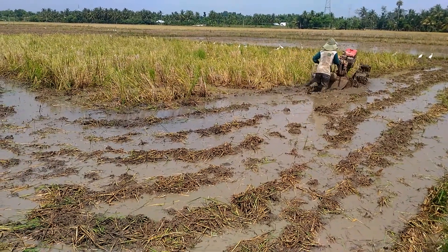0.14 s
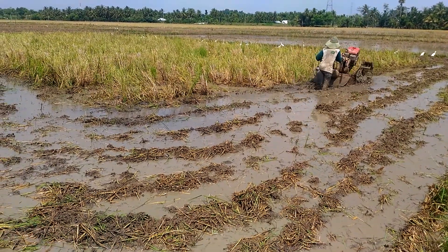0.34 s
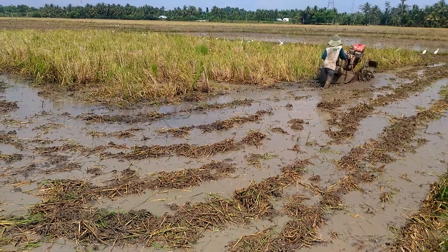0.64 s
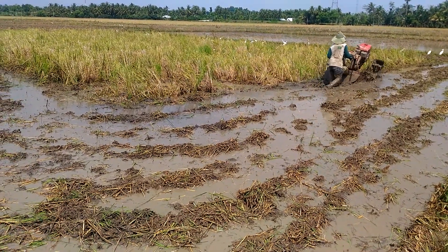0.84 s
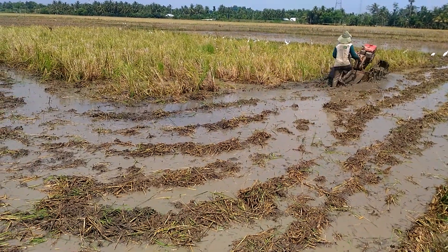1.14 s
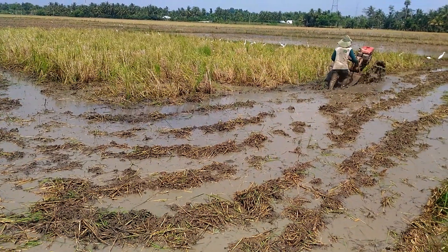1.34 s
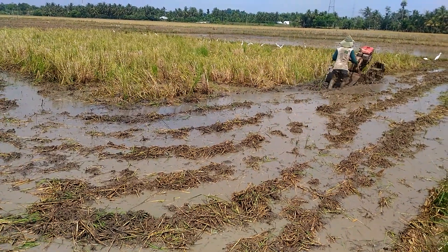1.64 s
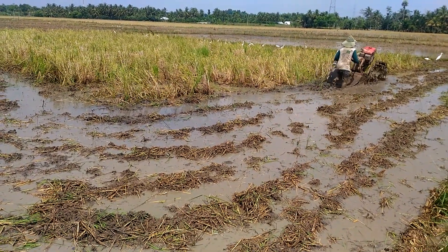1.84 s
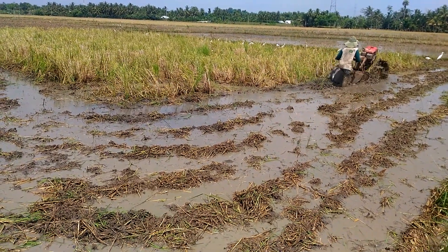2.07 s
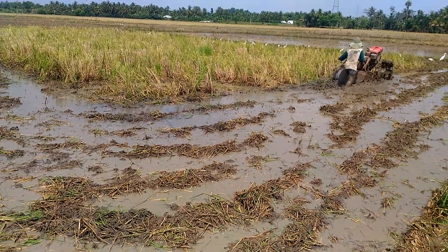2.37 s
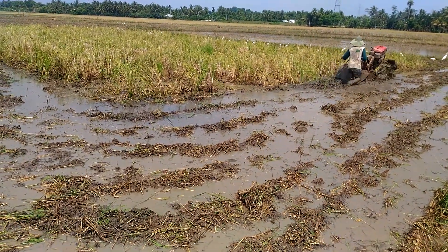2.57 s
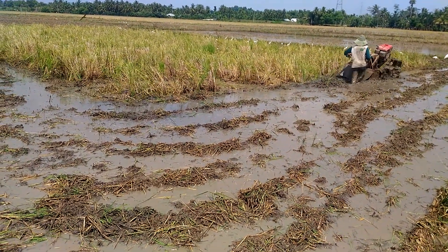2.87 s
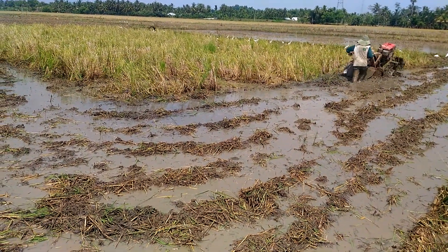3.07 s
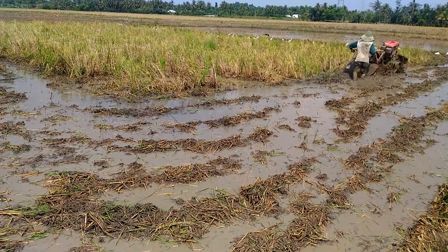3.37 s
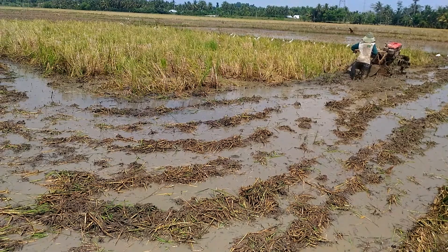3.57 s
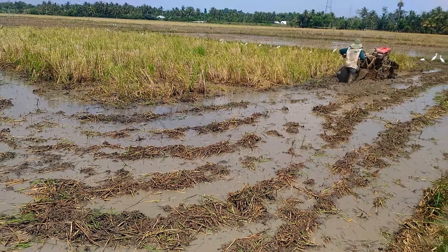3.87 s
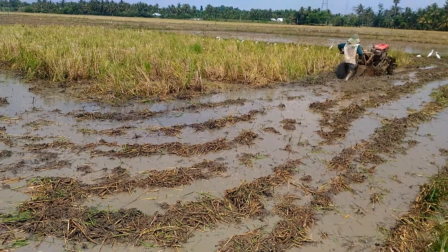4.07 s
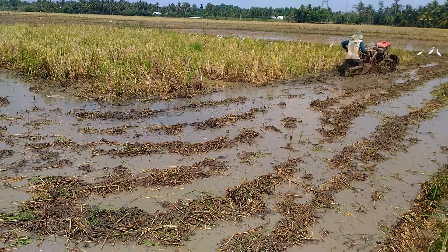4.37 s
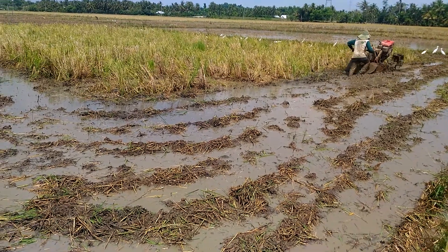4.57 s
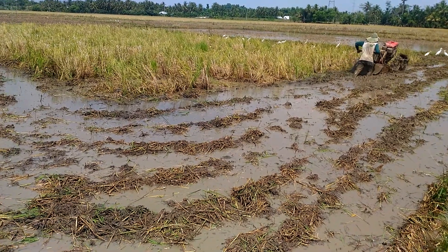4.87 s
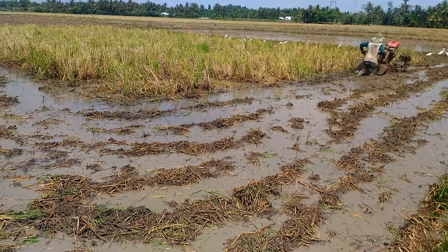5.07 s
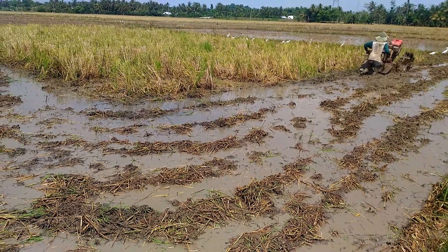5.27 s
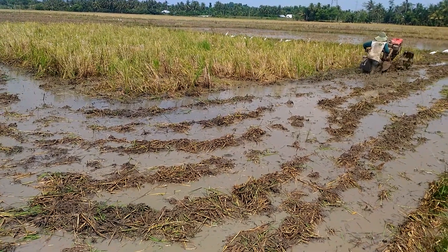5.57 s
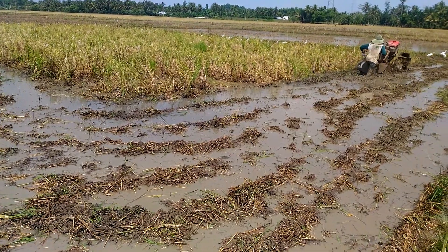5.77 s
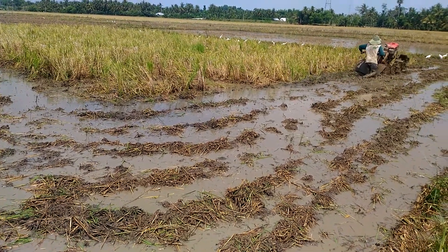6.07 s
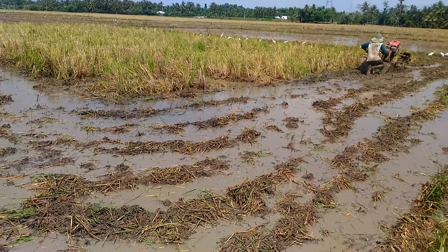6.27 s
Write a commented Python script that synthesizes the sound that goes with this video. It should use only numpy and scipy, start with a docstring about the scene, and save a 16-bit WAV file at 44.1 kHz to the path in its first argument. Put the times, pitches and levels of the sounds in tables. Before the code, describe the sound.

Fast, even thumping of a two-wheel tractor engine with bright rattling knock and faint gear whine, wind gusts building in an open flooded field.

```python
"""Two-wheel diesel tractor in a flooded field

A single-cylinder two-wheel tractor ploughs, slowly moving off to the right, heard at two microphone ports.
Each engine cycle is an exhaust thump smeared into a low throb, gas noise, a hard knock and lighter clatter.
A gear whines along with the crank, and now and then a valve ticks clearly.
A breeze of shaped noise rises until nearly halfway, then holds; gusts ride on it and large eddies thump the ports."""
import sys
import numpy as np
from scipy.fft import rfft, irfft, next_fast_len
from scipy.io import wavfile
from scipy.ndimage import map_coordinates

SR = 44100
rng = np.random.default_rng(int(sys.argv[2]) if len(sys.argv) > 2 else 0)


def store_wav(level_fs):
    """Save 16-bit WAV to argv[1]."""
    pcm = np.round(np.clip(np.atleast_2d(level_fs), -1, 1) * 32767)
    wavfile.write(sys.argv[1], SR, pcm.T.astype(np.int16))


N = 283122


def amp(db):
    """Gain of a level in dB."""
    return 10 ** (np.asarray(db) / 20)


def unit(x):
    """Scale to rms 1."""
    return x / np.sqrt(np.mean(x ** 2) + 1e-20)


def along(points, hz):
    """Read a (f/Hz, value) table on a log frequency axis."""
    f, v = np.transpose(points)
    return np.interp(np.log(hz + 1), np.log(f + 1), v)


def curves(rows):
    """One value per sample for each column after the time."""
    s, *cols = np.transpose(rows)
    return [np.interp(np.arange(N) / SR, s, c) for c in cols]


def swells(rows):
    """Sum of smooth bumps, each given by its middle, its length at half height and its height."""
    t = np.arange(N) / SR
    return sum(height * 0.5 ** ((2 * (t - middle) / length) ** 2) for middle, length, height in rows)


def wobble(rate):
    """A smooth random curve, rate knots a second."""
    knots = rng.standard_normal(int(N * rate / SR) + 4)
    return map_coordinates(knots, [np.arange(N) * rate / SR])


def filtered(x, response):
    """x times a complex response of frequency."""
    m = next_fast_len(N + SR // 2)
    return irfft(rfft(x, m) * response(np.fft.rfftfreq(m, 1 / SR)), m)[..., :N]


def above(hz, edge_hz):
    """Gain of a steep high-pass."""
    return 1 / np.sqrt(1 + (edge_hz / (hz + 1)) ** 8)


def causal(gains):
    """The complex harmonics of the most compact causal pulse with these harmonic gains."""
    cepstrum = irfft(np.log(np.pad(gains, (1, len(gains)), mode="edge")))
    half = len(cepstrum) // 2
    # folding the cepstrum forward gives minimum phase
    cepstrum[1:half] *= 2
    cepstrum[half + 1:] = 0
    return np.exp(rfft(cepstrum))[1:len(gains) + 1]


def periodic(crank, orders, harmonics):
    """A wave of rms 1 that repeats with every engine cycle."""
    cycle = np.linspace(0, 1, 2048)
    wave = (np.exp(2j * np.pi * np.outer(cycle, orders)) @ harmonics).real
    return unit(np.interp(crank % 1, cycle, wave))


def burst(crank, place, rise, decay):
    """An envelope that starts at one place of every cycle (times in cycles), and the number of that cycle."""
    number, age = np.divmod(crank - place + 1, 1)
    return (1 - np.exp(-age / rise)) * np.exp(-age / decay), number.astype(int)


# firing rate under the governor: t/s, rate/(cycles per s)
FIRING_RATE = [(0.0, 20.82), (0.95, 20.84), (1.3, 21.01), (1.6, 20.94), (1.9, 21.07), (2.5, 20.89),
               (2.95, 21.09), (3.5, 20.92), (4.0, 20.94), (4.3, 20.83), (4.6, 21.05), (4.9, 20.92),
               (5.4, 21.08), (5.8, 20.97), (6.42, 20.93)]


def turning():
    """The crank's running count of engine cycles, the clock of every engine sound."""
    return np.cumsum(curves(FIRING_RATE)[0]) / SR


# low exhaust note, relative levels: multiple of the firing rate, level/dB
EXHAUST_NOTE = [(1, -27), (2, -19.5), (3, -16.5), (4, -17.5), (5, -7), (6, -6.5), (7, -5.5), (8, 1.5),
                (9, -3), (10, -4), (11, -3.5), (12, -4), (13, -34.5), (14, -14), (15, -4), (16, -22),
                (17, -19.5), (18, -20), (19, -17.5), (20, -24.5)]
# all-pass delays that spread the thump through the cycle: centre f/Hz, width/Hz
THUMP_SPREAD = [(41, 79), (83.7, 3), (105.5, 3), (177, 19), (237, 6.6)]


def exhaust(crank):
    """One thump per cycle, smeared by all-pass delays into a long low throb."""
    opens = .754  # place of the exhaust valve's opening in the cycle, 0-1
    orders, db = np.transpose(EXHAUST_NOTE)
    hz = orders * np.mean(np.transpose(FIRING_RATE)[1])
    # each all-pass shifts the harmonics in phase but leaves their levels alone
    spread = np.prod([centre ** 2 - hz ** 2 + 1j * hz * width for centre, width in THUMP_SPREAD], axis=0)
    harmonics = -causal(amp(db)) * spread.conj() / spread
    uneven_crank = crank - opens + 0.0019 * wobble(21)
    return periodic(uneven_crank, orders, harmonics) * amp(0.11 * wobble(22.8))


# gas surges in one cycle, relative levels: place in the cycle (0-1), level/dB
GAS_SURGES = [(.225, -1), (.33, -6), (.71, 0)]


def surging(crank, rise, decay):
    """The envelope of the gas surges."""
    return sum(amp(db) * burst(crank, place, rise, decay)[0] for place, db in GAS_SURGES)


# rasp of the gas through the valves, relative levels: multiple of the firing rate, level/dB
VALVE_RASP = [(23, -0.5), (24, -0.5), (25, -8), (26, -7.5), (27, 0), (28, -7.5), (29, 0), (30, -4.5),
              (31, 3.5), (32, 3.5), (33, -2), (34, -10.5), (35, -7), (36, -4), (37, -1.5), (38, -13),
              (39, -4), (40, -9), (41, -5.5), (42, -4.5), (43, -15), (44, -11), (45, -13), (46, -21.5),
              (47, -3), (48, -16)]


def rasp(crank, steady=0.76):
    """Gas surges through the valves a few times a cycle, with randomly wavering strength."""
    orders, db = np.transpose(VALVE_RASP)
    orders = np.round(orders)
    surges = sum(amp(level) * np.exp(-2j * np.pi * orders * place) for place, level in GAS_SURGES)
    # the surges set only the phases; the table sets the levels
    harmonics = causal(amp(db)) * surges / abs(surges)
    wave = periodic(crank + 0.0016 * wobble(30), orders, harmonics)
    gate = steady + surging(crank, rise=0.021, decay=0.074)
    return unit(wave * gate * amp(2.1 * wobble(45)))


# spectrum of gas rushing from the silencer, relative: f/Hz, level/dB per Hz
SILENCER_RUSH = [(20, -19), (60, -8.5), (170, 2.5), (260, 2), (450, -17), (660, -3), (800, -7),
                 (920, -15.5), (2500, -39)]


def puff(crank, steady=0.94):
    """Turbulence from the silencer: shaped noise that swells on every surge of gas."""
    gate = steady + surging(crank, rise=0.018, decay=0.078)
    return unit(filtered(gate * rng.standard_normal(N), lambda hz: amp(along(SILENCER_RUSH, hz))))


# clatter spectrum at each microphone port, relative: f/Hz, level/dB per Hz
LEFT_PORT = [(500, -10.5), (850, -6), (1100, -11), (1720, -6), (2450, -8), (3020, -1), (3280, -6),
             (3550, -1), (4050, -10.5), (4500, -13), (5000, -7.5), (5430, -11), (6000, -7.5), (6600, -8.5),
             (8200, -27.5), (11700, -36), (14000, -39)]
RIGHT_PORT = [(500, -1), (850, -13.5), (1100, -10), (1400, -9.5), (1850, -5), (2200, -6.5), (2480, 0.5),
              (2800, -7), (3020, 0.3), (3280, -6), (3550, -1.8), (4900, -2.5), (5450, -10), (5800, -21),
              (6500, -6.5), (10200, -13), (14000, -32.5)]
# how alike the two ports hear it before those spectra: f/Hz, likeness (0-1)
LIKENESS = [(500, 0.98), (1800, 0.83), (2650, 0.67), (2950, 1), (3400, 0.99), (4000, 0.57), (5100, 0.77),
            (5700, 0.14), (6600, 0.45), (8000, 0.1)]


def at_ports(pair, band):
    """Two unrelated signals become one band of clatter as each port hears it."""
    turn = lambda hz: np.arccos(np.clip(along(LIKENESS, hz), 0, 1)) / 2
    mid, side = filtered(pair, lambda hz: band(hz) * np.array([np.cos(turn(hz)), np.sin(turn(hz))]))
    colour = lambda hz: amp([along(LEFT_PORT, hz), along(RIGHT_PORT, hz)])
    return filtered(np.array([mid + side, mid - side]), colour)


# metal contacts in one cycle, relative levels:
# place in the cycle (0-1), casing level/dB, head level/dB, knock level/dB, decay/cycles, scatter/dB
METAL_CONTACTS = [(.18, -5.5, -16, -10, 0.13, 2.3), (.25, -9.5, -9.5, -12, 0.1, 3.5),
                  (.33, -9, -10.5, -10.5, 0.22, 2), (.464, -1.5, -1.5, -0.5, 0.13, 1.5),
                  (.615, -8, -4, -10, 0.055, 0.5), (.87, -16, -16, -15.5, 0.26, 0)]


def clatter(crank, part, rattle, rise, grain_db, band, repeat=0.48):
    """Valve gear and combustion strike one part of the engine in a fixed order over a steady rattle."""
    power = rattle ** 2
    for place, casing_db, head_db, knock_db, decay, scatter_db in METAL_CONTACTS:
        gate, number = burst(crank, place, rise, decay)
        part_db = dict(casing=casing_db, head=head_db, knock=knock_db)[part]
        strength_db = part_db + scatter_db * rng.standard_normal(size=200)  # one draw per cycle
        power = power + (gate * amp(strength_db[number])) ** 2
    # the same parts meet in every cycle, so part of their ring repeats
    starts = np.searchsorted(crank, np.floor(crank))
    same = rng.standard_normal((2, SR))[:, np.arange(N) - starts]
    ring = rng.standard_normal((2, N)) + repeat * same
    # each blow is a cluster of tiny impacts
    blows = np.sqrt(power) * amp(grain_db * wobble(900)) * ring
    return unit(at_ports(blows, band))


# base level of the casing's clatter: t/s, level/dB
CASING_LEVEL = [(0, -34.7), (1.35, -34), (2.1, -35.5), (2.65, -35.5), (2.92, -36.5), (3.2, -35.5),
                (3.7, -35), (4.25, -34.5), (4.65, -37), (4.83, -38), (5.1, -36.5), (5.8, -36.5),
                (6.42, -37.5)]
# base level of the cylinder head's clatter: t/s, level/dB
HEAD_LEVEL = [(0, -33), (1.1, -34), (1.42, -34.5), (1.65, -33.5), (2.05, -35), (2.55, -34.5), (3.07, -35.5),
              (3.35, -34), (3.95, -33.5), (4.55, -34), (4.83, -36), (5.05, -34), (5.35, -33), (5.6, -36),
              (5.8, -34.3), (6.42, -36)]
# spells in which the knock turns softer or harder: middle t/s, length at half height/s, change/dB
KNOCK_SPELLS = [(1.18, 0.14, 0.8), (1.42, 0.2, -2.5), (2.13, 0.54, -5.5), (2.6, 0.29, 2.6), (3.5, 0.6, 0.8),
                (4.5, 0.43, 2.3), (4.86, 0.14, -7), (5.6, 0.2, -5.5), (6.2, 0.85, -2.5)]
# base knock at the start, and how fast it fades as the tractor moves off
KNOCK_DB, KNOCK_FADE_DB_PER_S = -33.5, 0.21
FIRING_SCATTER_DB = 0.98  # unevenness of each part from firing to firing


def metal_levels():
    """dB of casing, head and knock: each varies from firing to firing, so the colour of the blows varies."""
    t = np.arange(N) / SR
    uneven = lambda: FIRING_SCATTER_DB * wobble(20.954)
    casing_db = curves(CASING_LEVEL)[0] + uneven()
    head_db = curves(HEAD_LEVEL)[0] + uneven()
    knock_db = KNOCK_DB - KNOCK_FADE_DB_PER_S * t + swells(KNOCK_SPELLS) + uneven()
    return casing_db, head_db, knock_db


# block resonances just after the knock, relative levels: f/Hz, level/dB, decay/cycles
BLOCK_RINGS = [(1388, -1.5, 0.16), (1774, 1, 0.09), (2530, -18, 0.28), (4040, -3, 0.05)]


def block(crank):
    """The piston slaps the liner after each firing and rings the block as decaying, wavering sines."""
    place, ring = .52, 0
    seconds = (crank - place) % 1 / curves(FIRING_RATE)[0]  # time since the slap
    for hz, db, decay in BLOCK_RINGS:
        gate, number = burst(crank, place, rise=0.042, decay=decay)
        strength_db = db + 2.5 * rng.standard_normal(size=200)
        tone = np.sin(2 * np.pi * hz * seconds + 1.83 * wobble(150))
        ring = ring + gate * amp(strength_db[number]) * tone
    return unit(ring)


# gear whine before flutter and a fixed trim: t/s, level/dB
WHINE_LEVEL = [(0, -42), (.13, -37), (.31, -43), (.44, -37), (1.0, -42), (1.16, -36), (1.55, -40.5),
               (2.06, -36.5), (2.24, -45), (2.62, -36), (2.8, -47), (3.32, -47), (3.43, -39), (3.55, -38.5),
               (3.7, -49), (3.82, -43), (4.07, -39), (4.24, -48), (4.68, -48), (4.79, -38.5), (4.9, -49),
               (5.1, -41.5), (5.8, -43.5), (6.42, -40.5)]
WHINE_FLUTTER_DB, WHINE_FLUTTER_RATE = 1, 13  # depth, knots a second


def gear(crank):
    """A wavering, fluttering gear tone that follows the crank."""
    mesh = 39.53  # whine periods per engine cycle
    level_db = curves(WHINE_LEVEL)[0] + WHINE_FLUTTER_DB * wobble(WHINE_FLUTTER_RATE)
    tone = np.sin(2 * np.pi * mesh * crank + 0.31 * wobble(25))
    return amp(level_db - 3.0) * np.sqrt(2) * tone


# firings that crack harder than the rest: t/s, extra level/dB
HARD_FIRINGS = [(.0223, 1.5), (.071, 3), (.2149, 1), (.3107, 1), (.4559, 0.5), (.7911, 2), (.8869, 4),
                (1.0784, 1.7), (1.1268, 3.5), (3.1742, 3.5), (3.2695, 1.5), (4.4653, 2), (4.5605, 3.5),
                (4.9896, 3)]


def cracks(length=0.0067):
    """Extra dB for the first moments of the hardest firings, dying away over length seconds."""
    t = np.arange(N) / SR
    return sum(db * (t >= s) * np.exp(-np.abs(t - s) / length) for s, db in HARD_FIRINGS)


# phase lag of the left port behind the right: f/Hz, lag/rad
LEFT_LAG = [(30, -0.5), (200, 0.14), (700, 0.34), (1000, 1), (1400, 1.16), (1800, 2.0), (2100, 1.46),
            (2290, 2.9), (2600, 1), (2850, 2.95), (3100, 3), (3350, 3.5), (3550, 3.5), (3850, 4), (4150, 4),
            (5200, 3.5), (6400, 7.5), (9000, 9)]


def reaching_ports(engine):
    """Half the phase lag delays the left port and half advances the right, so most pitches arrive right first."""
    return filtered(engine, lambda hz: np.exp(.5j * along(LEFT_LAG, hz) * np.array([[-1], [1]])))


# extra lag of the left port as the tractor moves to the right: t/s, lag/s
MOVING_LAG = [(0, -0.00003), (2.8, 0), (6.42, 0.000007)]


def moving_right(ports):
    """The left port hears the engine later and later."""
    late = curves(MOVING_LAG)[0] * SR
    return np.array([map_coordinates(ports[0], [np.arange(N) - late], order=5), ports[1]])


# spectrum of wind on the ports, relative: f/Hz, level/dB per Hz
WIND_SPECTRUM = [(15, -20), (35, -12), (65, 3), (160, 5.5), (250, -3.5), (400, -9.5), (600, -26),
                 (1500, -30), (4000, -80)]
# gusts on top of the breeze: middle t/s, length at half height/s, extra level/dB
WIND_GUSTS = [(2.88, 0.25, 5.5), (4.42, 0.22, 5), (4.79, 0.34, 7), (5.65, 0.15, 3), (5.95, 0.23, 4.5),
              (6.35, 0.23, 3)]
# the breeze rises from calm and then holds
CALM_DB, BREEZE_DB = -54, -36
BREEZE_START_S, BREEZE_FULL_S = 0.39, 2.77
# a stronger wind also tears at the ports, higher up
TEAR_DB, TEAR_GROWS, TEAR_HZ = -50.5, 1.7, 280  # level in the full breeze, dB per dB of wind, lower edge


def wind():
    """A rising breeze with gusts; eddies hit each port separately, in quick lumps, and gusts are brighter."""
    wind_db = curves([(BREEZE_START_S, CALM_DB), (BREEZE_FULL_S, BREEZE_DB)])[0] + swells(WIND_GUSTS)
    eddies = filtered(rng.standard_normal((2, N)), lambda hz: amp(along(WIND_SPECTRUM, hz)))
    lumps = amp(0.99 * np.array([wobble(22), wobble(22)]))
    tear = unit(lumps * filtered(eddies, lambda hz: above(hz, TEAR_HZ)))
    tear_db = TEAR_DB + TEAR_GROWS * (wind_db - BREEZE_DB)
    return amp(wind_db) * unit(lumps * eddies) + amp(tear_db) * tear


# single large eddies: middle t/s, length at half height/s, level/dB, f/Hz
EDDY_THUMPS = [(1.64, 0.055, -40, 62), (2.735, .05, -38, 60), (2.81, .06, -35, 92.4),
               (2.93, 0.054, -34, 108), (2.97, 0.1, -42, 60), (3.24, .05, -40, 58), (3.89, .06, -37, 62),
               (4.44, 0.06, -33, 62.8), (4.665, .05, -32, 102), (4.74, .05, -33, 62),
               (4.93, .05, -39, 97.5), (5.938, 0.054, -35, 70), (6.325, .1, -36, 70)]


def thumps():
    """Each large eddy shoves the air at both ports to and fro for a few uneven swings."""
    t = np.arange(N) / SR
    uneven = 0.5 * wobble(40) + 0.4 * np.array([wobble(30), wobble(30)])  # shared, then per port
    swings = 0
    for middle, length, db, hz in EDDY_THUMPS:
        envelope = swells([(middle, length, amp(db))])
        swings = swings + envelope * np.sin(2 * np.pi * hz * t + uneven)
    return np.sqrt(2) * swings


# spells in which a valve ticks clearly: middle t/s, length at half height/s, extra level/dB
TICK_SPELLS = [(2.55, .25, 13), (3.6, 0.4, 13), (4.0, .3, 14), (4.5, 0.57, 18), (4.55, .03, 2),
               (5.2, .3, 7)]
TICK_DB, TICK_HZ, TICK_WIDTH_HZ = -45, 6700, 800  # level outside those spells, centre, width


def valve(crank, place=0.186, scatter_db=5.0):
    """A valve seats once a cycle with a short, bright ring of narrow-band noise."""
    gate, number = burst(crank, place, rise=0.008, decay=0.06)
    band = lambda hz: 1 / (1 + (2 * (hz - TICK_HZ) / TICK_WIDTH_HZ) ** 2)
    ring = unit(at_ports(rng.standard_normal((2, N)), band))
    tick_db = TICK_DB + swells(TICK_SPELLS) + scatter_db * rng.standard_normal(size=200)[number]
    return ring * gate * amp(tick_db)


# exhaust thump and puff, before a fixed trim for each: t/s, level/dB
EXHAUST_LEVEL = [(0, -26), (1.8, -25.5), (2.15, -25), (2.8, -26), (4, -26), (4.7, -27.5), (5.2, -26),
                 (6.42, -26)]
# level of the gas rasp: t/s, level/dB
RASP_LEVEL = [(0, -45), (1.2, -43), (1.42, -40), (1.7, -44.5), (2.3, -41), (2.7, -42), (2.95, -44),
              (3.4, -44.5), (3.75, -40.5), (4.05, -38.5), (4.5, -41.5), (5.2, -39), (6.42, -40)]


def scene():
    """All engine sounds follow the crank; wind and thumps act on the ports directly."""
    crank = turning()
    exhaust_db, = curves(EXHAUST_LEVEL)
    casing_db, head_db, knock_db = metal_levels()

    gas = amp(exhaust_db + 1.3) * exhaust(crank)
    gas = gas + amp(curves(RASP_LEVEL)[0]) * rasp(crank)
    gas = gas + amp(exhaust_db - 10.0) * puff(crank)

    # the casing sounds lowest, the head above it, the knock on top
    casing = amp(casing_db) * clatter(crank, "casing", rattle=0.2, rise=0.038, grain_db=0.5,
                                      band=lambda hz: above(hz, 592) * (1 - above(hz, 3170)))
    head = amp(head_db) * clatter(crank, "head", rattle=0.13, rise=0.096, grain_db=1.85,
                                  band=lambda hz: above(hz, 3000) * (1 - above(hz, 6470)))
    knock = amp(knock_db) * clatter(crank, "knock", rattle=0.13, rise=0.02, grain_db=0.44, repeat=0.23,
                                    band=lambda hz: above(hz, 7200))
    metal = (casing + head + knock) * amp(cracks())
    metal = metal + amp(casing_db - 9.5) * block(crank) + valve(crank)

    ports = reaching_ports(gas + gear(crank) + metal)
    engine = moving_right(ports) * amp([[.3], [-.3]])  # left and right trim in dB
    return engine + wind() + thumps()


TOP_HZ = 14450


def record(dry):
    """A sharp band limit: nothing at or above TOP_HZ passes."""
    return filtered(dry, lambda hz: hz < TOP_HZ)


dry = scene()
out = record(dry)
store_wav(out)
```